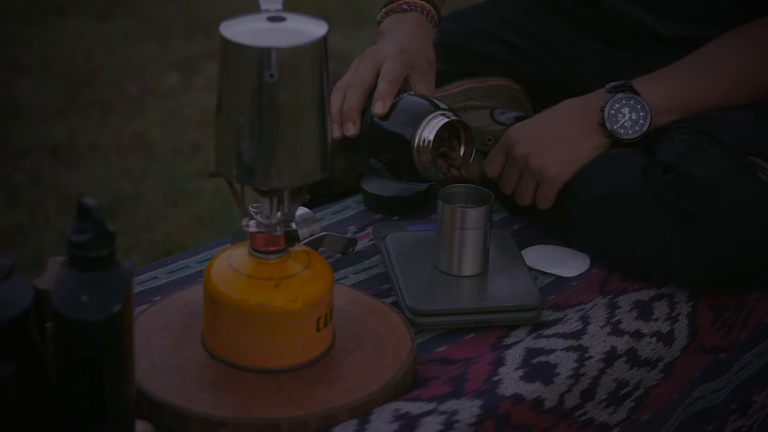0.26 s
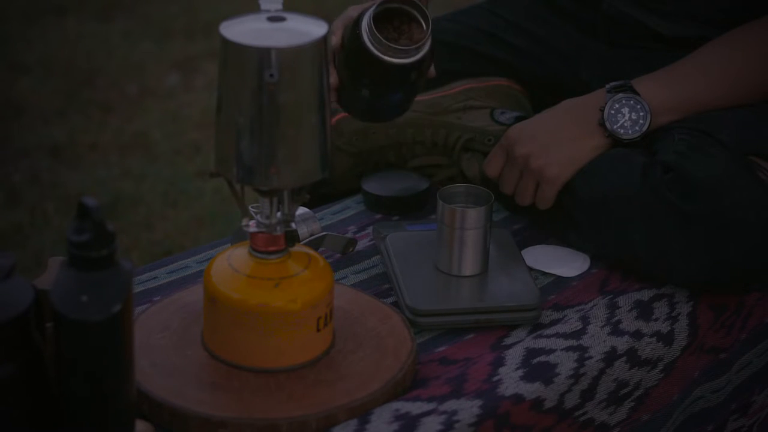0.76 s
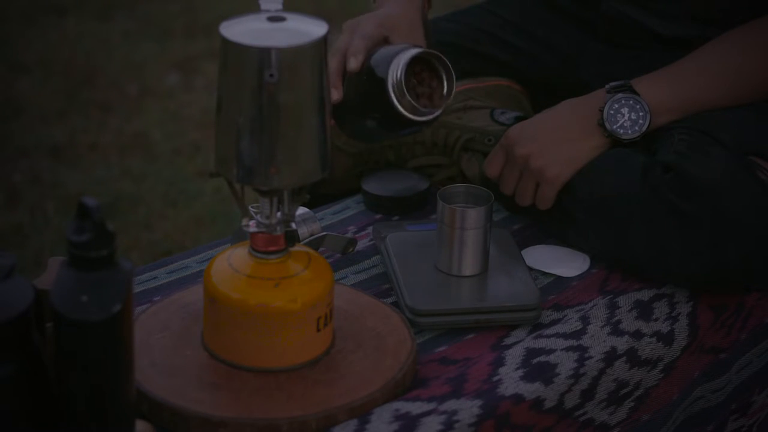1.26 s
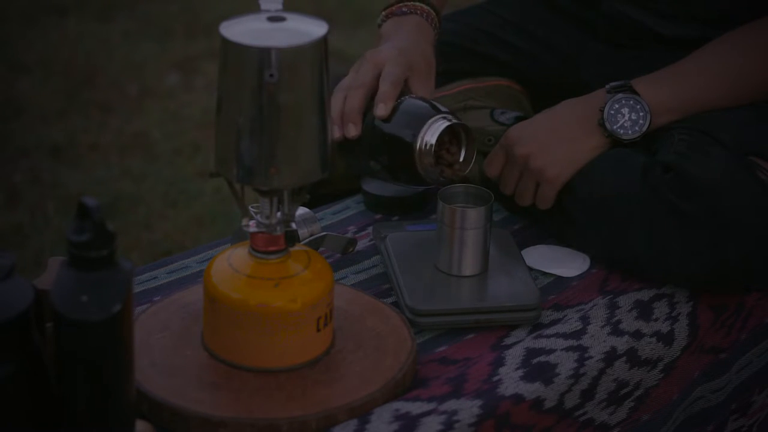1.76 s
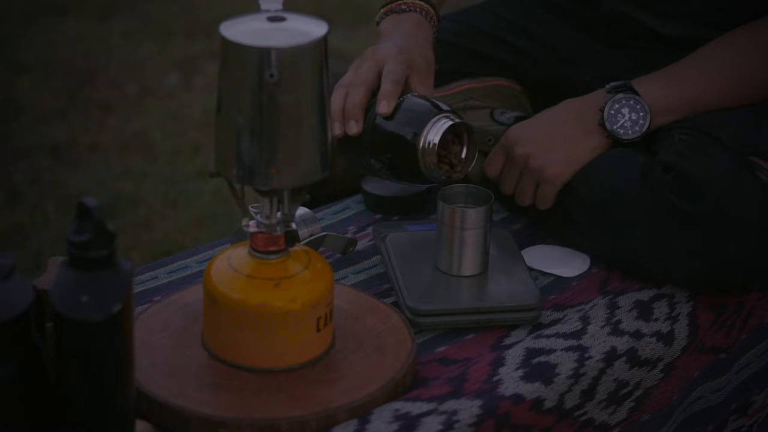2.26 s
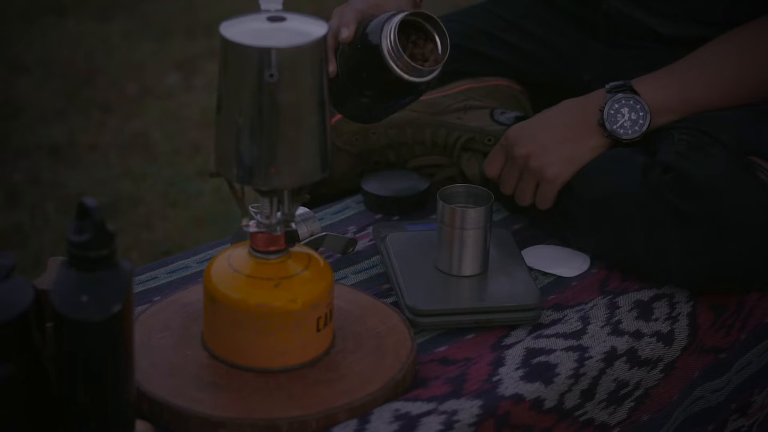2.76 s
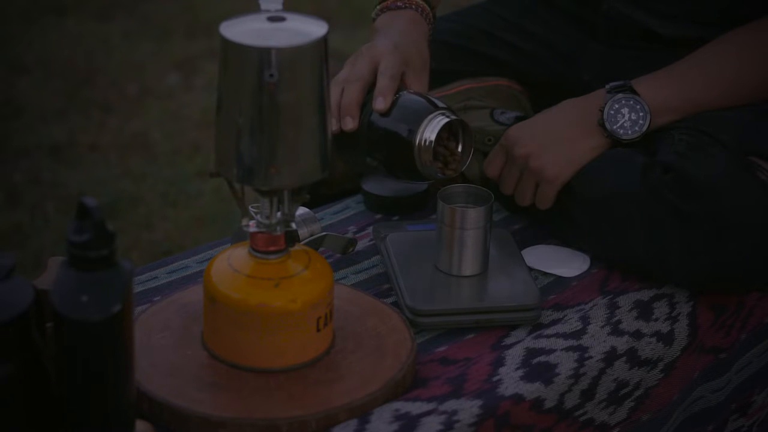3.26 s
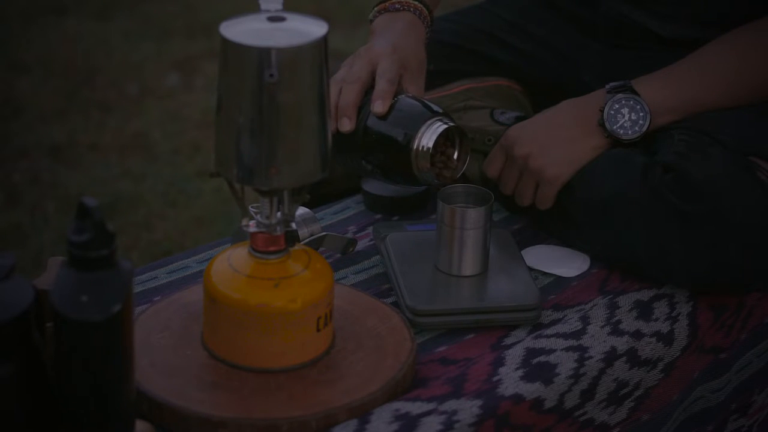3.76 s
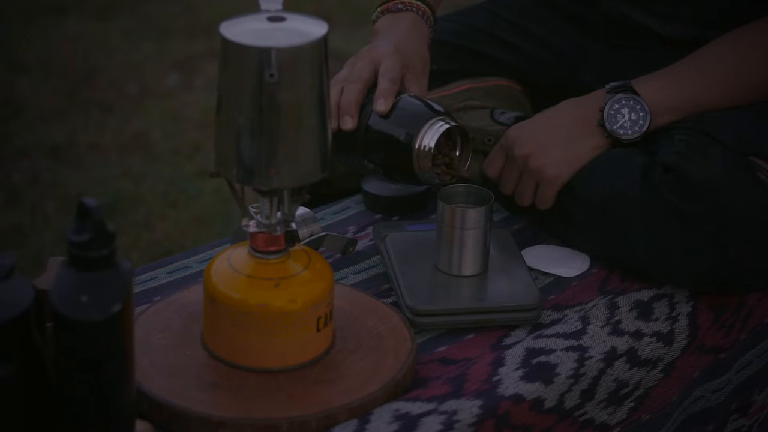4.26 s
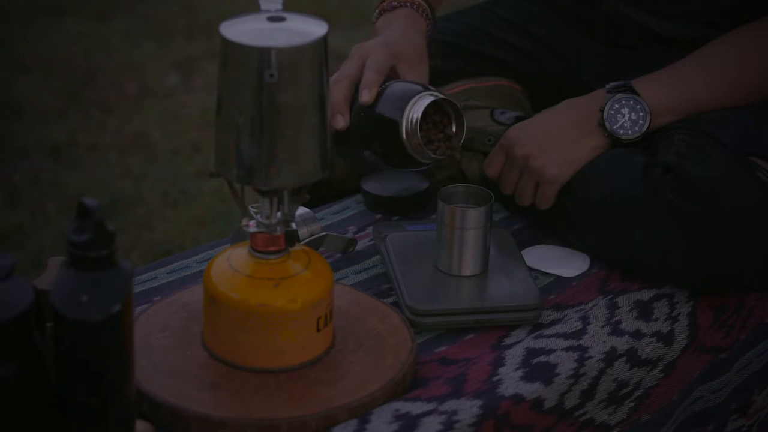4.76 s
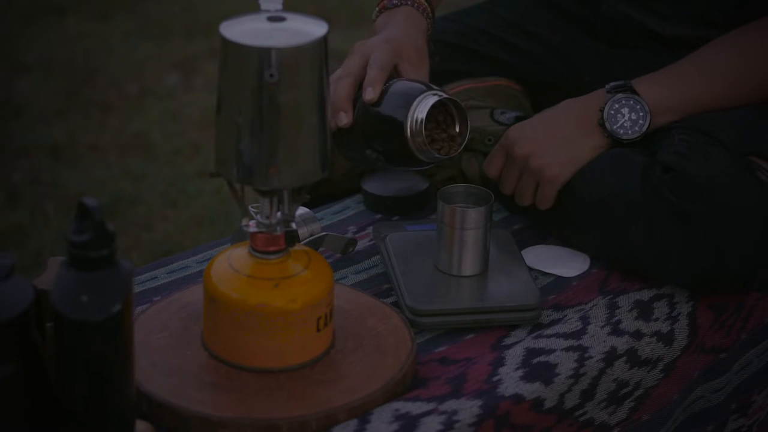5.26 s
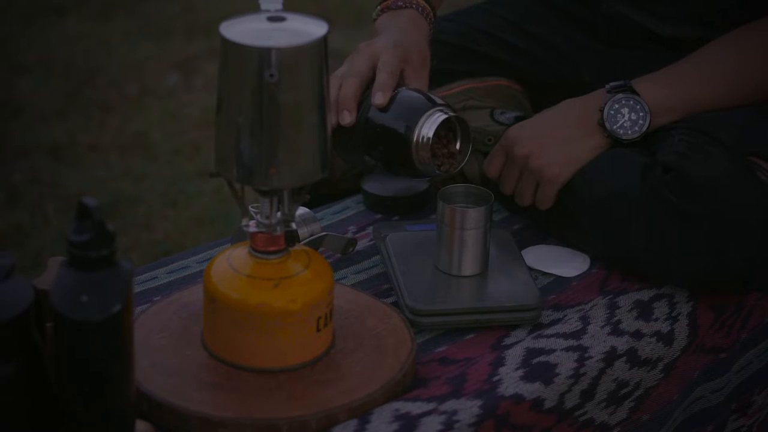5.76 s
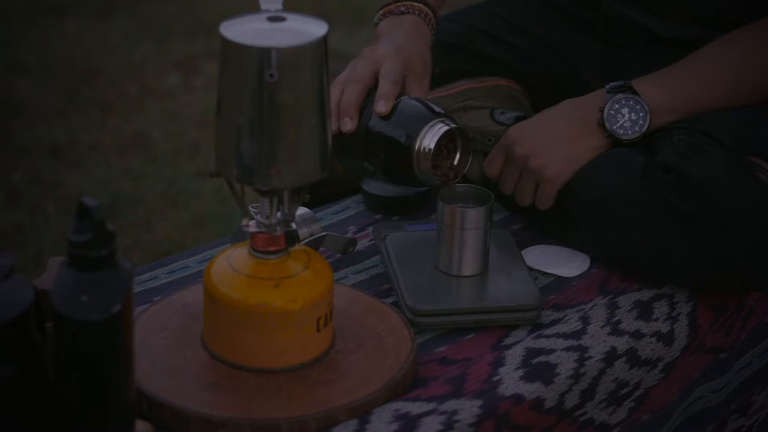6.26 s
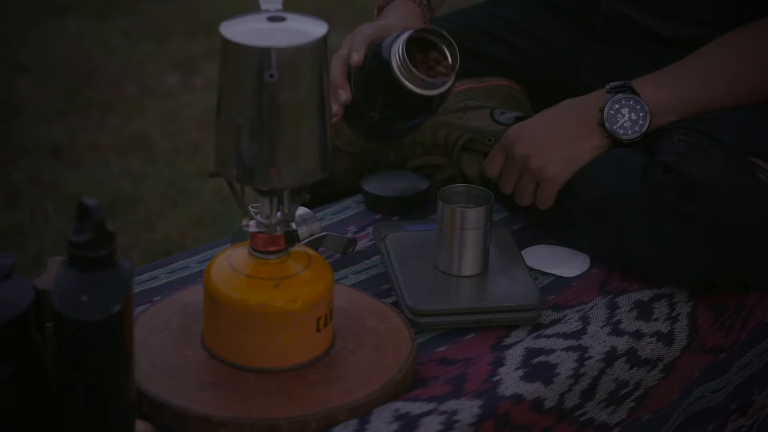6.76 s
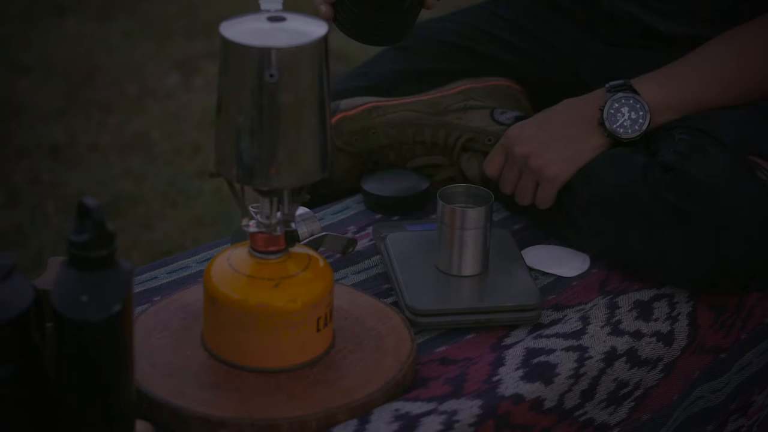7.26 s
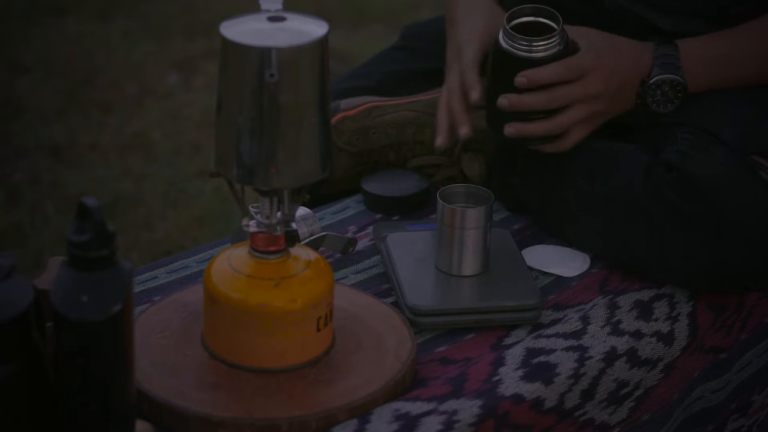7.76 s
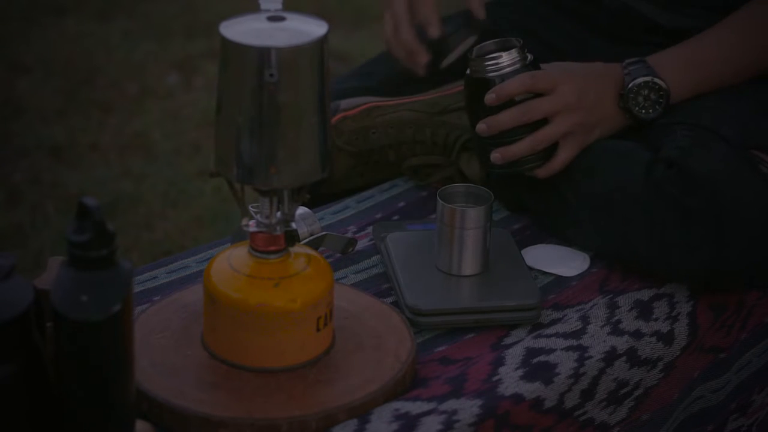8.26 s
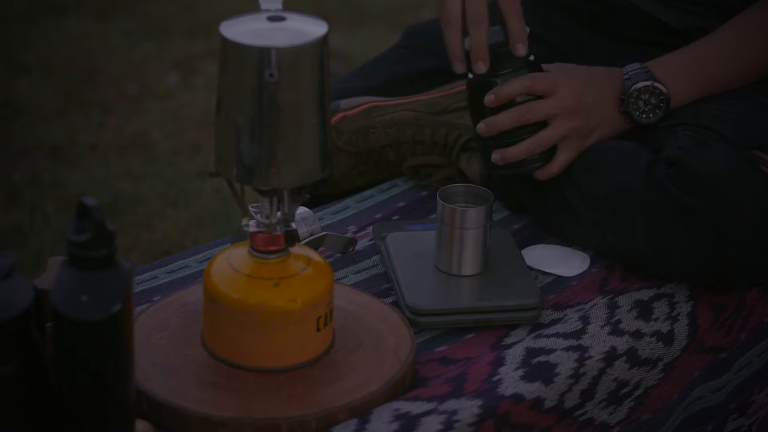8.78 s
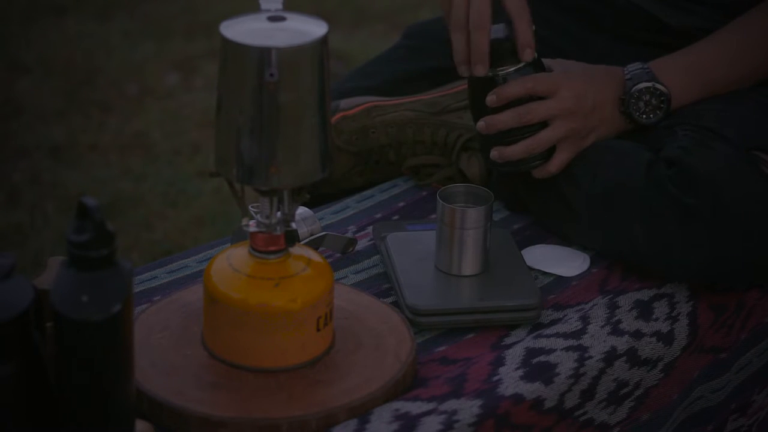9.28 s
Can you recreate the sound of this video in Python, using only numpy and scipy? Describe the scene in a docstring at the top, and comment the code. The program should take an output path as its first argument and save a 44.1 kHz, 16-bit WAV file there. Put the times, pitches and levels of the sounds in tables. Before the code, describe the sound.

On a lawn at dusk, crickets chirp in short pulsed groups near the microphones, over a constant high trill and thin patchy hiss weighted to the right. Coffee beans rattle in a jar and drop into a small steel cup, with crisp ticks and pings, early, around two, four and a half and six and a half seconds. Soft hand and lid knocks follow. A faint distant whine falls late. Wide, oddly phased stereo with little bass.

```python
"""A lawn at dusk: field crickets chirp in falling pulses near 5 kHz, each pulse a short sliding tone, over
a dense chorus of high trills, pulsed noise in resonant bands, mostly to the right, and patchy hiss.
Close by, coffee beans tick in a jar and drop into a small steel cup: noise bursts and decaying sines, with
soft knocks of hands and lid. Far off, brief hoots sound and a faint whine falls; a thin whistle wanders: all
wavering sines. The two microphone ports are wired in opposite polarity."""
import sys
import numpy as np
from scipy import signal
from scipy.fft import rfft, irfft, next_fast_len
from scipy.io import wavfile
from scipy.ndimage import uniform_filter1d, map_coordinates

SR = 44100
rng = np.random.default_rng(int(sys.argv[2]) if len(sys.argv) > 2 else 0)


def digitize_waveform(pressure):
    """Quantize a signal to 16-bit integers and store it at the path in sys.argv[1].

    Rows of a 2-D input are taken as channels; values are limited to [-1, 1].
    """
    field = np.atleast_2d(pressure).T
    bounded = np.clip(field, -1, 1)
    quanta = np.round(bounded * 32767).astype(np.int16)
    wavfile.write(sys.argv[1], SR, quanta)


def linear_from_db(decibels):
    """Turn decibels (scalar or array-like) into linear amplitude factors; 0 gives 1."""
    return 10 ** (np.asarray(decibels, float) / 20)


N = 419813
TIME = np.arange(N) / SR


def unit(x):
    """Scale to rms 1, each channel alone."""
    return x / np.sqrt(np.mean(x ** 2, axis=-1, keepdims=True) + 1e-20)


def along(hz, at_hz, values):
    """Values read on a log frequency axis."""
    return np.interp(np.log(hz + 1), np.log(at_hz + 1), values)


def wobble(rate_hz, t=TIME):
    """A smooth random curve over the times t, rate_hz knots a second."""
    knots = rng.standard_normal(int(N * rate_hz / SR) + 4)
    return map_coordinates(knots, [t * rate_hz])


def filtered(x, response):
    """x times a complex response of frequency."""
    size = next_fast_len(x.shape[-1] + 8192)
    spectrum = rfft(x, size) * response(np.fft.rfftfreq(size, 1 / SR))
    return irfft(spectrum, size)[..., :x.shape[-1]]


def pair(shared, stray, alike):
    """Left and right noise of a given likeness: right is shared, left mixes shared and stray."""
    alike = np.clip(alike, 0, 1)
    return np.array([alike * shared + np.sqrt(1 - alike ** 2) * stray, shared])


def add(out, start_s, sound):
    """Mix a stereo sound in at start_s."""
    i = min(max(round(start_s * SR), 0), N)
    out[:, i:i + sound.shape[1]] += sound[:, :N - i]


def tone(rows, rough):
    """A wavering sine on a pitch and level curve, faded at both ends."""
    s, hz, db = np.transpose(rows)[:3]
    out, on = np.zeros(N), (TIME > s[0]) & (TIME < s[-1])
    t = TIME[on]
    fade = np.clip(np.minimum(t - s[0], s[-1] - t) / 0.0097, 0, 1)
    phase = 2 * np.pi * np.cumsum(np.interp(t, s, hz)) / SR + rough * wobble(40, t)
    level_db = np.interp(t, s, db) + 2.77 * rough * wobble(42, t)
    out[on] = np.sqrt(2) * fade * linear_from_db(level_db) * np.sin(phase)
    return out


# evening air: (frequency [Hz], relative density [dB], left minus right [dB], likeness [0-1])
AIR_SPECTRUM = [(100, -128, -1, 0.4), (245, -122, 4.5, 0), (544, -112, -1, 0.7), (1000, -99, -0.1, 0.6),
                (1498, -90.5, -1, 0.4), (2270, -89.5, -0.9, .33), (3880, -92, -0.54, 0.1),
                (5800, -93, -2.5, 0.02), (8400, -90, -6.5, 0.5), (12800, -85.5, -10, .12),
                (14700, -87.5, -10, 0)]


def air():
    """A gas burner, far insects and traffic merge into hiss, patchy in time and frequency."""
    at_hz, db, pan_db, alike = np.transpose(AIR_SPECTRUM)
    z = signal.stft(rng.standard_normal((2, N)), nperseg=512)[2]
    patches = uniform_filter1d(rng.standard_normal(z.shape[1:]), 6, 0)
    patches = uniform_filter1d(patches, 12, 1)
    patch_db = 2.2 * patches / patches.std()
    noise = signal.istft(z * linear_from_db(patch_db), nperseg=512)[1][:, :N]
    share = lambda f: np.clip(along(f, at_hz, alike), 0, 1)
    colour = lambda f: linear_from_db(along(f, at_hz, db) - db.max())
    left_colour = lambda f: colour(f) * linear_from_db(along(f, at_hz, pan_db))
    right = filtered(noise[0], colour)
    left = filtered(noise, lambda f: left_colour(f) * [share(f), np.sqrt(1 - share(f) ** 2)]).sum(axis=0)
    return linear_from_db(-50.5) * np.array([left, right]) / right.std()


# trilling insects: (wing resonance [Hz], width [Hz], pulse rate [Hz], right rms before swell [dB],
# left minus right [dB], likeness [0-1], gate sharpness [1])
TRILLERS = [(10574, 370, 130, -48, -10.5, 0.4, 0.72), (10490, 570, 131.8, -48, -13, 1, 0.64),
            (10522, 706, 330, -45, -10.5, .75, 0.19), (7747, 330, 190, -52.5, -9.5, .7, 0.69),
            (7610, 370, 203, -53.5, -9.5, 0.8, 0.83), (6600, 230, 58, -65, -10, 1, 1.4),
            (6600, 220, 85, -64.5, -9.5, 0.4, 1.2), (6620, 270, 140, -65.5, -10, 0.8, 0.59),
            (15500, 340, 57, -55, -16, 0, 0.24), (4850, 490, 23, -61, -5.5, 0.4, 0.1)]


def trills():
    """Wing teeth rasp in bursts at a nearly steady rate and ring a broad wing resonance."""
    out = np.zeros((2, N))
    for hz, width_hz, rate_hz, db, pan_db, alike, sharp in TRILLERS:
        cycle = 2 * np.pi * (rate_hz * TIME + 0.13 * wobble(3) + rng.random())
        rasp = np.exp(sharp * np.cos(cycle)) * pair(*rng.standard_normal((2, N)), alike)
        wing = lambda f: np.exp(-.5 * np.abs((f - hz) / width_hz) ** 1.97)
        swell_db = 0.99 * wobble(6)
        out += linear_from_db(db + swell_db) * linear_from_db([[pan_db], [0]]) * unit(filtered(rasp, wing))
    return out


# field crickets: name -> (nominal centre [Hz], pulse spacing [s], left minus right [dB],
# nominal half stroke [s])
CRICKETS = {"right": (4930, .0313, -12.5, .006), "middle": (4950, .0303, -3.5, .0075),
            "slow": (4830, .041, -14, .008), "low": (4580, .0316, -15, .007)}
# near chirps: (first pulse [s], cricket, pulses [count], right level before soft start [dB])
NEAR_CHIRPS = [(0.0127, "middle", 3, -39.5), (0.1985, "middle", 3, -39), (0.612, "slow", 5, -43),
               (0.79, "right", 2, -49), (0.966, "right", 4, -51.5), (1.1732, "low", 3, -41.5),
               (1.3804, "low", 4, -43), (1.7113, "low", 3, -42), (1.923, "slow", 5, -42.5),
               (1.9943, "right", 3, -43), (2.071, "right", 4, -39.5), (2.2554, "right", 3, -43.5),
               (2.302, "right", 3, -39), (2.4818, "right", 2, -47), (2.4976, "right", 3, -38),
               (2.6942, "right", 3, -39), (2.7601, "middle", 3, -41), (2.925, "right", 3, -39),
               (2.9464, "middle", 3, -41.5), (3.1206, "right", 3, -39.5), (3.136, "middle", 3, -40.5),
               (3.3234, "middle", 3, -41.5), (3.5, "right", 3, -40), (3.5444, "middle", 3, -41.5),
               (3.71, "right", 3, -42.5), (3.7305, "middle", 3, -40.5), (4.603, "middle", 3, -50),
               (4.636, "right", 2, -48), (4.7955, "middle", 3, -49), (4.81, "right", 3, -49.5),
               (5.03, "right", 2, -49), (5.097, "slow", 3, -42), (5.8794, "right", 3, -48),
               (6.0441, "right", 4, -46), (6.2368, "right", 4, -44), (6.3752, "slow", 3, -42.5),
               (6.8913, "middle", 3, -41), (7.0777, "middle", 3, -42), (7.2642, "middle", 3, -43.5),
               (7.4535, "middle", 3, -42.5), (7.5814, "middle", 3, -52.5), (7.7739, "middle", 2, -46),
               (7.8371, "right", 3, -39.5), (7.8852, "slow", 2, -41), (8.038, "right", 3, -38),
               (8.2338, "right", 3, -38), (8.4301, "right", 3, -38.5), (8.6242, "right", 3, -38.5),
               (9.191, "slow", 4, -44), (9.3815, "right", 3, -45.5)]


def chirps():
    """Each wing stroke is a tone sliding down as the file slows; a chirp starts softly; grass smears it."""
    out, t = np.zeros((2, N)), np.arange(-600, 600) / SR
    near = [(s, count, db, *CRICKETS[who]) for s, who, count, db in NEAR_CHIRPS]
    faint = [(s * N / SR, 3, -57 + 6 * (db - .5), 4750 + 350 * hz, .031, -16 + 13 * pan, .007)
             for s, hz, db, pan in rng.random((40, 4))]
    for first_s, count, db, hz, spacing_s, pan_db, stroke_s in near + faint:
        lag_rad = 0.049 * (pan_db + 11.0)  # singers nearer the middle reach the left port later
        for k, (start, steep, length, pitch) in enumerate(rng.random((count, 4))):
            shape = np.exp(-np.abs(t / (stroke_s * (.9 + .2 * length))) ** 2.8)
            slide_hz_per_s = 46000 * .031 / spacing_s * (.85 + 0.39 * steep)
            cycles = (hz + 80 * (pitch - .5)) * t - slide_hz_per_s * t ** 2 / 2 + start
            phase = 2 * np.pi * cycles
            stereo = np.array([linear_from_db(pan_db) * np.sin(phase - lag_rad), np.sin(phase)])
            soft_start_db = 3.5 * 0.33 ** k
            add(out, first_s + k * spacing_s + t[0], linear_from_db(db - soft_start_db) * shape * stereo)
    t = np.arange(SR // 5) / SR
    tail = rng.standard_normal((2, len(t))) * linear_from_db(-60 * t / 0.17)
    tail /= np.linalg.norm(tail[0])
    return out + linear_from_db(-8.5) * signal.fftconvolve(out, tail, axes=1)[:, :N]


# soft knocks of hands and lid: (time [s], starting level [dB], resonance [Hz])
SOFT_KNOCKS = [(0.0217, -37.5, 3050), (0.0885, -37, 2500), (0.1076, -36.5, 3060), (0.175, -39, 3100),
               (2.055, -43, 3200), (2.19, -41, 3100), (1.9577, -41, 1530), (4.401, -39.5, 3140),
               (4.5914, -41, 3230), (5.2509, -38.5, 2380), (5.7341, -38.5, 1680), (6.628, -41, 3080),
               (6.748, -42.5, 3000), (8.7463, -38.5, 3700), (8.772, -37, 2150)]


def knocks():
    """Padded contacts: a puff of noise around one resonance, broader for the low ones."""
    out, t = np.zeros((2, N)), np.arange(SR // 10) / SR
    for s, db, hz in SOFT_KNOCKS:
        width = 0.2 if hz > 2800 else 0.36  # in log frequency
        resonance = lambda f: np.exp(-.5 * (np.log((f + 1) / hz) / width) ** 2)
        puff = filtered(rng.standard_normal(len(t)), resonance)
        add(out, s, linear_from_db(db - 60 * t / 0.037) * unit(puff) * linear_from_db([[-4], [0]]))
    return out


# bean contacts: (time [s], relative tick level [dB], nominal cup strike [dB])
BEAN_CONTACTS = [(0.0296, -35, -54), (0.0883, -28, -50), (0.0915, -28, -50), (0.108, -37, -58),
                 (0.157, -38, -46), (0.1705, -25, -34), (0.204, -42, -44), (0.2598, -35, -50),
                 (0.327, -39, -60), (0.3434, -35.5, -58), (0.4374, -36.5, -51), (2.0505, -42.5, -56),
                 (2.0885, -41, -50), (2.1128, -41, -36.5), (2.1905, -35, -35), (2.208, -37.5, -56),
                 (4.3992, -28, -54), (4.5052, -41, -58), (4.578, -36, -58), (4.6173, -36, -59),
                 (6.3732, -36, -54), (6.4056, -41, -55), (6.4663, -35, -56.5), (6.5756, -33.5, -48.5),
                 (6.6224, -39, -56), (6.628, -44, -42), (6.748, -27.5, -29), (6.8304, -35.5, -36),
                 (7.614, -41.5, -52), (7.6854, -40, -53), (7.7368, -41, -53), (8.1203, -41, -50.5),
                 (8.205, -38.5, -57), (8.2771, -37.5, -59)]
# steel cup modes: (frequency [Hz], level against strike [dB], 60 dB decay [s])
CUP_MODES = [(5250, -6, .15), (5150, 0, .014), (8156, -2, .08), (9017, -6, .15), (9167, -2, .09),
             (9100, 5, .02), (11900, -19, .08), (13420, -8, .08), (14016, 0, .07)]


def beans():
    """Bright tick, dull jar knock, cup modes where struck hard enough, and one more tick as the bean bounces."""
    out, t = np.zeros((2, N)), np.arange(SR // 4) / SR
    hz, mode_db, t60_s = np.transpose(CUP_MODES)[:, :, None]
    rim = hz > 11000
    bright = lambda f: 1 / (1 + (12000 / (f + 1)) ** 3.5)
    jar = lambda f: np.exp(-.5 * ((f - 3100) / 550) ** 2)
    small = lambda f: 1 / (1 + (2200 / (f + 1)) ** 4)
    for s, db, ring_db in BEAN_CONTACTS:
        burst = rng.standard_normal((2, len(t)))
        jar_chance, flight_chance, loss_chance = rng.random(3)
        tick = linear_from_db(db + 13.0 - 60 * t / 0.015) * filtered(burst[0], bright)
        knock = linear_from_db(db - 4 + 8.7 * jar_chance - 60 * t / 0.045) * filtered(burst[1], jar)
        strike_db = np.where(rim, (db + ring_db) / 2 - 4, ring_db) + rng.normal(0, 3.1, hz.shape)
        rings = strike_db > np.where(rim, -42, -52)
        modes = linear_from_db(mode_db + strike_db - 60 * t / t60_s) * np.sin(2 * np.pi * hz * t)
        ring = np.sum(rings * modes, axis=0)
        onset = 1 - np.exp(-t / 0.00021)
        add(out, s, onset * (linear_from_db([[-9], [0]]) * (tick + ring) + linear_from_db([[-3], [0]]) * knock))
        flight_s = .012 * (.3 + 0.62 * flight_chance)
        add(out, s + flight_s, linear_from_db(-8 - 4.2 * loss_chance) * linear_from_db([[-9], [0]]) * tick)
    return filtered(out, small)  # small objects radiate no bass


# faint far hoots: (start [s], length [s], frequency [Hz], nominal rms [dB], left minus right [dB])
FAR_HOOTS = [(2.115, 0.14, 940, -80, 8), (2.12, 0.11, 1405, -74, 8), (2.15, 0.1, 3140, -58, -7),
             (2.694, 0.15, 940, -79, 8), (4.247, 0.13, 3300, -69, 1), (4.685, 0.15, 1095, -83, 9.5),
             (4.721, 0.14, 3290, -63.5, -7), (7.454, 0.22, 1097, -81, 10), (8.097, .1, 990, -78.5, 5)]


def hoots():
    """Brief wavering sines from far off, each at one nominal pitch."""
    out = np.zeros((2, N))
    for s, length_s, hz, db, pan_db in FAR_HOOTS:
        out += linear_from_db([[pan_db], [0]]) * tone([(s, hz, db), (s + length_s, hz, db)], rough=1.2)
    return out


# falling whine: (time [s], frequency [Hz], rms before flutter [dB])
WHINE_CURVE = [(7.03, 1585, -72), (7.15, 1588, -60), (7.26, 1535, -61), (7.38, 1520, -73), (7.5, 1567, -63),
               (7.9, 1514, -56), (8.1, 1474, -57), (8.38, 1393, -57), (8.45, 1330, -65), (8.62, 1213, -68)]
# the whine's lower octave: (time [s], frequency [Hz], nominal rms [dB])
LOWER_OCTAVE = [(6.98, 747, -84), (7.046, 799, -71.5), (7.22, 783, -76)]


def whine():
    """A far sine falls, its level fluttering in random dips, and drifts across the ports."""
    flutter_db = -5 * np.abs(wobble(12))
    right = linear_from_db(flutter_db) * tone(WHINE_CURVE, rough=1.0) + tone(LOWER_OCTAVE, rough=0.79)
    late = np.roll(right, round(.00023 * SR))  # reaches the left port later
    ends_s = [WHINE_CURVE[0][0], WHINE_CURVE[-1][0]]
    pan_db = np.interp(TIME, ends_s, (-11.5, -6.5)) + 1.2 * wobble(12)  # left minus right
    return np.array([linear_from_db(pan_db) * late, right])


# thin whistle, one list a phrase: (time [s], frequency [Hz], nominal rms [dB])
WHISTLE_PHRASES = [
    [(7.39, 11600, -63), (7.43, 13000, -54), (7.48, 13050, -51), (7.5, 13250, -54), (7.53, 12300, -61),
     (7.59, 12020, -59), (7.66, 11900, -62)],
    [(7.69, 13450, -57), (7.75, 13550, -55), (7.84, 12200, -60.5), (7.89, 12500, -58), (7.93, 12150, -55),
     (7.98, 12500, -57), (8.04, 11860, -59)],
]


def whistle():
    """A thin sine wanders in pitch, sitting right."""
    phrases = sum(tone(rows, rough=0.44) for rows in WHISTLE_PHRASES)
    return linear_from_db([[-11.5], [0]]) * phrases


def scene():
    """All sources, each placed left to right."""
    return air() + trills() + chirps() + knocks() + beans() + hoots() + whine() + whistle()


def band_limit(x):
    """A steep low-pass at the top of the band."""
    return signal.sosfilt(signal.butter(12, 16820, fs=SR, output="sos"), x)


# left port phase against the right: (frequency [Hz], phase [rad])
PORT_PHASE = [(300, 3.1), (2000, 2.77), (5000, 2.48), (7600, 2.24), (10600, 1.27), (15000, .3)]


def record(dry):
    """A low cut and a band limit; the left port is reversed and a little late."""
    at_hz, turn_rad = np.transpose(PORT_PHASE)
    band = lambda f: (f < 15780) / (1 + (450 / (f + 1)) ** 3)
    ports = lambda f: band(f) * np.array([np.exp(1j * along(f, at_hz, turn_rad)), np.ones_like(f)])
    return band_limit(filtered(dry, ports))


dry = scene()
out = record(dry)
digitize_waveform(out)
```